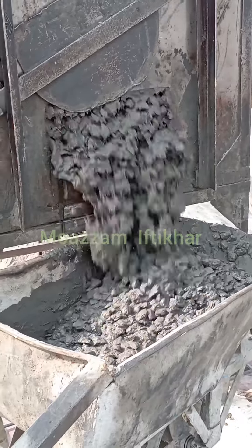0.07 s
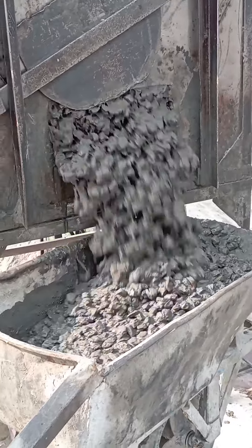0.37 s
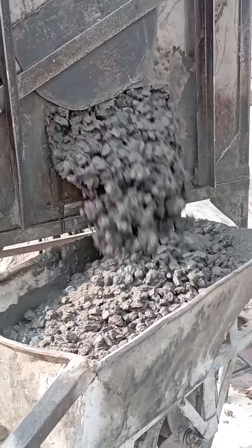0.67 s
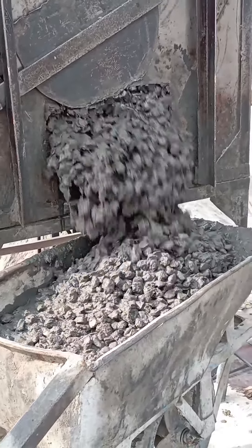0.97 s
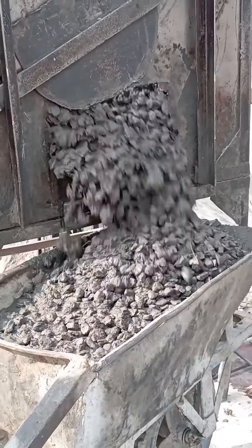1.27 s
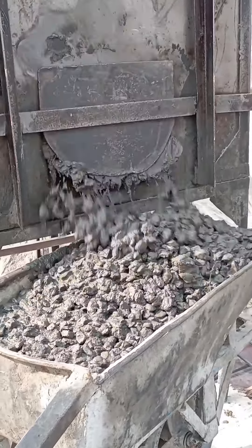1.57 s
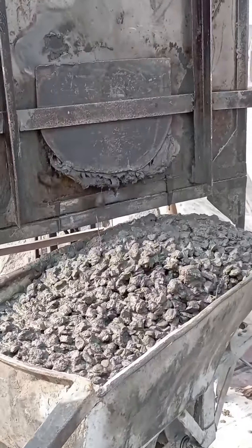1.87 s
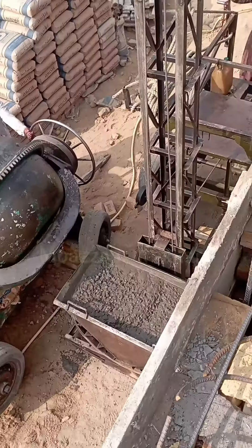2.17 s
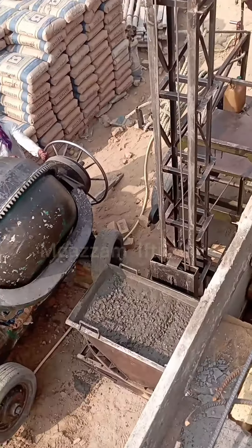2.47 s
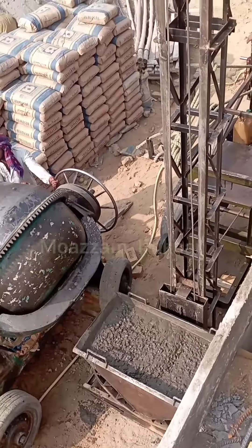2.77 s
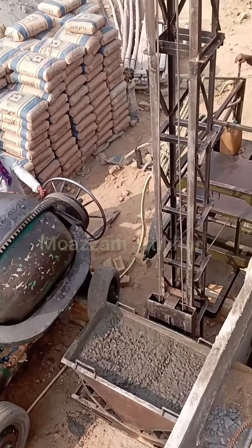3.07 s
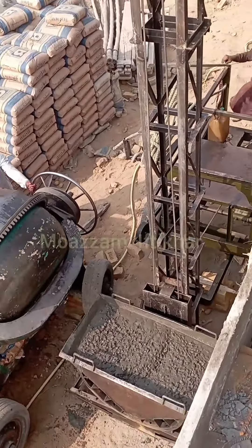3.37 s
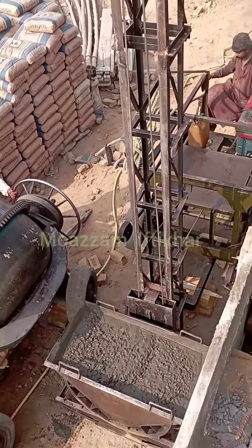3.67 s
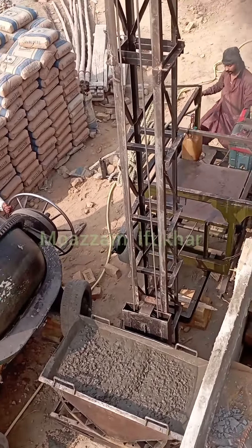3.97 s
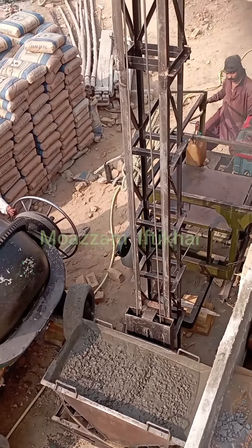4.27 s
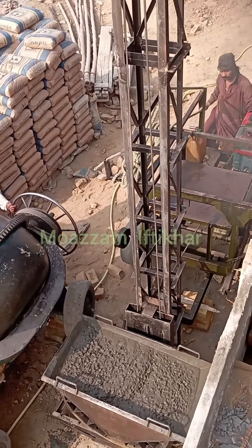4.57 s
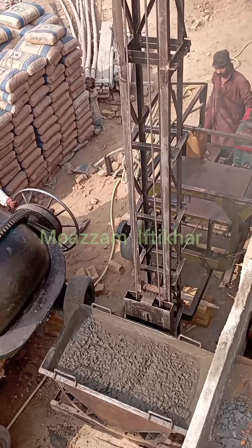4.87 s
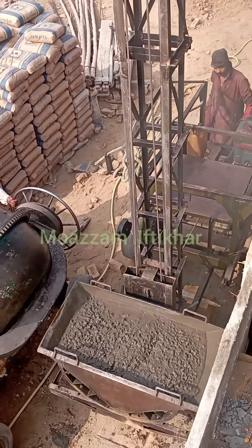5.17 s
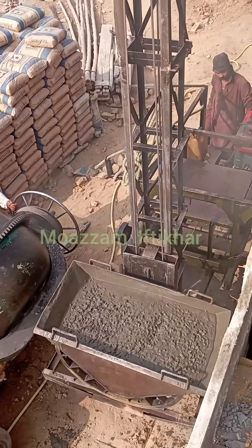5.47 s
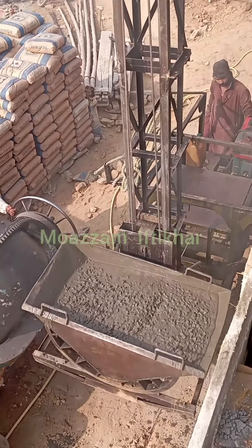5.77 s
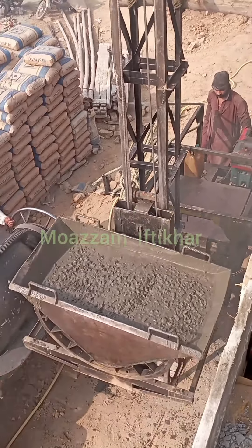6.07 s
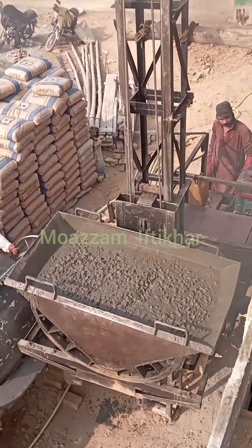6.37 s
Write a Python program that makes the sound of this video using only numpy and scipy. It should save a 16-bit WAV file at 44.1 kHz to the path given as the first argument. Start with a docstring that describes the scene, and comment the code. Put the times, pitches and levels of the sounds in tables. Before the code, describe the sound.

Wet gravelly concrete pours into a wheelbarrow over a thudding diesel, then a second, louder diesel engine speeds up.

```python
"""A building site, the microphone close beside a steel wheelbarrow. Wet concrete pours in from a mixer's
gate while its one-cylinder diesel thuds along; the gate scrapes shut and last stones drop.
After a short break the microphone is above the site: the mixer's diesel runs on while a second, louder
diesel speeds up to lift the hoist's skip, its exhaust slapping back from the walls."""
import sys
import numpy as np
from scipy import signal
from scipy.fft import rfft, irfft, next_fast_len
from scipy.io import wavfile
from scipy.ndimage import uniform_filter1d, map_coordinates

SR = 44100
rng = np.random.default_rng(int(sys.argv[2]) if len(sys.argv) > 2 else 0)


def master(y):
    """Save y as 16-bit WAV."""
    cut = np.clip(np.atleast_2d(y).T, -1, 1)
    pcm = np.round(cut * 32767)  # scale
    wavfile.write(sys.argv[1], SR, pcm.astype(np.int16))


N = 287532
TIME = np.arange(N) / SR


def amp(db):
    """Decibels to gain."""
    return 10 ** (np.asarray(db) / 20)


def unit(x):
    """Scale to rms 1."""
    return x / np.sqrt(np.mean(x ** 2) + 1e-20)


def along(points, hz):
    """Read (pitch_hz, value) rows on a log frequency axis."""
    pitches, values = np.transpose(points)
    return np.interp(np.log(hz + 1), np.log(pitches + 1), values)


def curve(rows):
    """Join (time_s, value) rows, one value per sample."""
    return np.interp(TIME, *np.transpose(rows))


def wobble(rate):
    """A smooth random curve, rate knots a second."""
    return map_coordinates(rng.standard_normal(int(N * rate / SR) + 4), [TIME * rate])


def swell(start, attack, hold, t60):
    """Envelope of one sound that rises, holds and dies."""
    age = TIME - start
    return np.clip(age / attack, 0, 1) * amp(-60 * np.maximum(age - attack - hold, 0) / t60)


def blows(times, db):
    """One impulse per event."""
    return np.bincount(np.round(np.asarray(times) * SR).astype(int), amp(db), N)[:N]


def puffs(times, db, rise, hold, t60):
    """Envelope of bursts that open, blow for a moment and die."""
    t = TIME[:SR // 4]
    shape = (1 - np.exp(-(t / rise) ** 2)) * amp(-60 * np.maximum(t - hold, 0) / t60)
    return np.sqrt(np.abs(signal.fftconvolve(blows(times, db) ** 2, shape ** 2)[:N]))


def filtered(x, response):
    """Filter x by a complex response of frequency."""
    size = 2 * next_fast_len(N // 2 + SR // 4)
    return irfft(rfft(x, size) * response(np.fft.rfftfreq(size, 1 / SR)), size)[..., :N]


def low_cut(x, hz):
    """Roll off the bass below hz."""
    return filtered(x, lambda f: f ** 3 / np.sqrt(f ** 6 + hz ** 6))


def resonate(x, hz, width):
    """One resonance; width is a share of its pitch."""
    edges = np.clip([hz / (1 + width), hz * (1 + width)], 20, [.4 * SR, .45 * SR])
    return signal.lfilter(*signal.butter(1, edges, "bandpass", fs=SR), x)


def ringing(x, colour):
    """Causal colour of unit energy: the body rings only after it is hit."""
    def response(hz):
        cepstrum = irfft(np.log(amp(along(colour, hz))))
        half = len(cepstrum) // 2
        causal = np.r_[cepstrum[0], 2 * cepstrum[1:half], np.zeros(half)]
        return unit(np.exp(rfft(causal)))
    return filtered(x, response)


def struck(hits, modes):
    """Every (start_s, level_db) blow rings the modes at new strengths."""
    t, out = TIME[:SR // 4], np.zeros(N)
    hz, level, t60 = np.transpose(modes)[:, :, None]
    for start, db in hits:
        strength, phase = rng.standard_normal((2, len(modes), 1))
        decay = amp(db + level + 2 * strength - 60 * t / t60)
        ring = np.sum(decay * np.sin(2 * np.pi * hz * t + phase), axis=0)
        span = out[round(start * SR):][:len(t)]
        span += (ring * (1 - np.exp(-t / 0.0016)))[:len(span)]
    return out


def patchy(pair, depth_db):
    """Colour that shifts from moment to moment: a random gain field over frequency and time."""
    spectra = signal.stft(pair, nperseg=512)[2]
    field = uniform_filter1d(rng.standard_normal(spectra.shape[1:]), size=4, axis=0)
    field = unit(uniform_filter1d(field, size=6, axis=1))
    return unit(signal.istft(spectra * amp(depth_db * field), nperseg=512)[1][:, :N])


def grains(rate, scatter_db):
    """Random contacts of stones of six sizes, each size with its own pitch; a few hit much harder."""
    out = np.zeros((2, N))
    for hz in np.geomspace(500, 13000, 6):
        when, luck, left, right = rng.random((int(rate * N / SR / 6), 4)).T
        force = amp(-scatter_db * np.log(np.maximum(luck, .01)))
        train = [np.bincount((when * N).astype(int), force * (side - .5), N) for side in (left, right)]
        out += resonate(np.array(train), hz, width=.3)
    return unit(out)


def firing_times(speed):
    """When an engine fires, given (time_s, firings_per_s) rows."""
    running = (TIME >= speed[0][0]) & (TIME < speed[-1][0])
    cycles = np.cumsum(curve(speed) * running) / SR
    return TIME[1:][np.diff(np.ceil(cycles)) > 0]


# How alike the microphone's left and right sides are: pitch_hz, correlation
STEREO_LIKENESS = [(60, 1), (290, 1), (640, 0.57), (1400, 0.11), (3000, 0.33), (9000, 0.12), (15000, 0.3)]
def spread(pair, colour, lead_ms=0):
    """Two unrelated signals as one coloured stereo sound of rms 1, the left side lead_ms ahead."""
    def mid_and_side(hz):
        angle = np.arccos(np.clip(along(STEREO_LIKENESS, hz), -1, 1)) / 2
        return amp(along(colour, hz)) * [np.cos(angle), np.sin(angle)]
    mid, side = filtered(pair, mid_and_side)
    right = filtered(mid - side, lambda hz: np.exp(-2j * np.pi * hz * lead_ms / 1000))
    return unit(np.array([mid + side, right]))


def noise(colour, lead_ms=0):
    """Coloured stereo noise."""
    return spread(rng.standard_normal((2, N)), colour, lead_ms)


# Decay of the site around the microphone: pitch_hz, t60_s
SITE_DECAY = [(100, 0.13), (500, 0.16), (3000, 0.45), (12000, 0.41)]
def site_echo(x):
    """Diffuse answer of the site, drifting through four different tails."""
    out = np.zeros((2, N))
    for k in range(4):
        hz, t, spectra = signal.stft(rng.standard_normal((2, SR // 3)), SR, nperseg=256)
        decay = amp(-60 * t / along(SITE_DECAY, hz)[:, None])
        mid, side = signal.istft(spectra * decay, SR, nperseg=256)[1]
        tail = np.array([mid + side / 2, mid - side / 2])
        share = np.maximum(np.cos(2 * np.pi * (3.7 * TIME - k / 4)), 0)
        out += signal.fftconvolve((x * share)[None], tail / np.linalg.norm(tail[0]), axes=1)[:, :N]
    return out


# The yard's background, from beside the barrow: pitch_hz, level_db
YARD_COLOUR = [(25, -32), (60, -15), (120, 6.5), (210, 1), (290, -18), (400, -4.5), (680, -18),
               (1800, -21.5), (3500, -22.5), (6400, -27.5), (10000, -20.5), (16000, -42)]
def yard():
    """A faint, steady rumble behind the close sounds."""
    return amp(-37.5) * noise(YARD_COLOUR)


# The machinery, from above the site: pitch_hz, level_db
DIN_COLOUR = [(15, -43), (25, -38), (64, -11), (149, -13.5), (223, 3), (344, -12.5), (451, 1), (734, -12),
              (911, -9.5), (1020, -11), (3080, -17.5), (6210, -17.5), (8830, -10.5), (14400, -22),
              (16000, -28.5)]
def machinery_din():
    """A wavering din that grows 2 dB with each doubling of the hoist engine's speed."""
    level_db = -26.5 + 2 * hoist_octaves(TIME) + 0.88 * wobble(25)
    return amp(level_db) * patchy(noise(DIN_COLOUR, lead_ms=0.089), depth_db=2.5)


# Hiss near the engines, also blown at each firing of the mixer: pitch_hz, level_db
HISS_COLOUR = [(500, -4), (1500, -5.5), (3000, -6), (6500, -3), (8800, 3), (11000, 2.5), (13000, -5.5),
               (16000, -10)]
def hissing_rush():
    """One brief hiss as the sound from above opens."""
    envelope = swell(start=2.3, attack=.06, hold=0.13, t60=0.57)
    return envelope * amp(-23.5 + 1.2 * wobble(60)) * noise(HISS_COLOUR, lead_ms=.11)


# The mixer's engine speed, from beside the barrow and from above: time_s, firings_per_s
MIXER_SPEED_CLOSE = [(.029, 10.31), (2.15, 10.31)]
MIXER_SPEED_ABOVE = [(2.344, 9.83), (6.53, 9.39)]
# Knocks within one engine cycle: delay_s, level_db
CYCLE_KNOCKS = [(0, -11.5), (.008, 0), (.026, -1.5), (.055, -10), (.072, -8), (.086, -9.5)]
# The mixer's exhaust pipe: pitch_hz, level_db
MIXER_EXHAUST = [(25, -24.5), (50, -16.5), (75, 4), (115, -3), (160, -7), (212, 2.5), (290, -9), (410, -7),
                 (600, -18.5), (1000, -24.5), (4000, -52.5)]
# The drum's shell and a loose cover: pitch_hz, level_db, t60_s
DRUM_MODES = [(76, -9, 0.18), (111, -4, 0.099), (125.4, -1.5, 0.13), (201.7, -8.5, 0.31)]
COVER_MODES = [(894, 1.5, 0.066), (926, -6, 0.041), (1440, -12, 0.044)]
def mixer_engine(speed, thump_db, shell_db, hiss_db, cover_db, echo_db, lead_ms):
    """A slow diesel: each firing thumps, hisses and shakes the drum; knocks and a cover ring between."""
    firings = firing_times(speed)
    shell_luck, hiss_luck, cover_luck, *knock_luck = rng.normal(size=(len(firings), 9)).T
    kicks = sum(blows(firings + delay, thump_db + db + luck)
                for (delay, db), luck in zip(CYCLE_KNOCKS, knock_luck))
    thump = ringing(kicks, MIXER_EXHAUST)
    shell = struck(zip(firings + 0.0053, shell_db + shell_luck), DRUM_MODES)
    gas = puffs(firings, hiss_db + 1.3 * hiss_luck, rise=0.0021, hold=0.0076, t60=0.05)
    hiss = gas * noise(HISS_COLOUR, lead_ms)
    cover = struck(zip(firings + .058, cover_db + 1.5 * cover_luck), COVER_MODES)
    # much of the thump reaches the microphone by way of the surroundings
    return thump + amp(echo_db) * site_echo(thump) + shell + hiss + cover


# The hoist engine idles, is throttled up and settles on its governor: time_s, firings_per_s
HOIST_RUN_UP = [(2.359, 7.21), (2.528, 7.21), (3.617, 11.85), (4.582, 15.115), (6.53, 15.368)]
def hoist_octaves(times):
    """Speed of the hoist engine, in octaves from full speed."""
    return np.log2(np.interp(times, *np.transpose(HOIST_RUN_UP)) / HOIST_RUN_UP[-1][1])


# The hoist's pipe, exhaust gas and engine block, from above: pitch_hz, level_db
HOIST_EXHAUST = [(25, -18), (48, -16), (85, 4.5), (130, -2.5), (170, 1), (245, 3), (360, -8), (460, -1),
                 (640, -10.5), (850, -19), (1500, -36.5), (4000, -77)]
GAS_COLOUR = [(700, -17.5), (2500, -19), (5000, -14), (6800, -10.5), (8600, 2.5), (9700, -1.5), (11300, 1),
              (13000, -4.5), (16000, -17)]
BLOCK_COLOUR = [(290, -38), (500, -8.5), (666, -6), (752, -16.5), (898, -11.5), (1020, -13), (1410, -8),
                (2080, -12), (2400, -8.5), (2890, -12.5), (3340, -10), (5870, -14), (7000, -16.5),
                (9100, -41), (15400, -120)]
# Paths from the exhaust to the microphone, direct and by ground and walls: delay_s, gain
EXHAUST_PATHS = [(0, 0.45), (0.012, 0.17), (0.0196, 0.31), (0.0211, 0.28), (0.0228, .22), (.0331, 0.11),
                 (0.0377, 0.057)]
def hoist_engine():
    """Each firing thumps through the pipe, blows a rasp of gas and rattles the block, harder at speed."""
    firings = firing_times(HOIST_RUN_UP)
    octaves = hoist_octaves(firings)
    push_luck, blow_luck = rng.standard_normal((len(firings), 2)).T
    push_db = 3.5 + 6.5 * octaves + 1.2 * push_luck
    blow_db = 5 * octaves + .6 * blow_luck
    thump = ringing(blows(firings, push_db), HOIST_EXHAUST)
    slaps = filtered(thump, lambda hz: sum(gain * np.exp(-2j * np.pi * hz * delay)
                                           for delay, gain in EXHAUST_PATHS))
    blast = puffs(firings + 0.00036, blow_db - 8.5, rise=0.0017, hold=0.006, t60=0.071)
    afterblow = puffs(firings + 0.0063, blow_db - 28, rise=0.015, hold=0.016, t60=0.11)
    rasp = patchy(noise(GAS_COLOUR, lead_ms=0.12), depth_db=3) * amp(0.94 * wobble(500))
    shake = puffs(firings, blow_db - 14.5, rise=0.0035, hold=0.004, t60=0.16)
    clatter = patchy(noise(BLOCK_COLOUR, lead_ms=0.088), depth_db=3) * amp(0.76 * wobble(300))
    echo = low_cut(site_echo(thump), hz=125)  # longer waves pass the site's clutter without scattering
    return slaps + echo + (blast + afterblow) * rasp + shake * clatter


GATE_MOVES_S, GATE_SHUT_S = 1.362, 1.558
# Steel grinding on grit, close up: pitch_hz, level_db
GRIND_COLOUR = [(88, -40), (150, -16), (259, -4), (286, 5), (457, -10), (601, -25), (649, -12),
                (923, -22.5), (998, -11), (1360, -18), (2270, -13.5), (2500, -19), (4240, -24),
                (11000, -31), (16000, -39)]
# The gate clanking in its guides; clods landing and the gate reaching its stop: start_s, level_db
GATE_CLANKS = [(.003, -20.5), (1.368, -23), (1.384, -24.5), (1.412, -22), (1.478, -26.5), (1.542, -27),
               (1.553, -26)]
BARROW_KNOCKS = [(.036, -22), (.622, -22), (.66, -24), (.731, -19.5), (.775, -30), (1.409, -26),
                 (1.556, -12.5)]
# The gate plate and the barrow's sheet steel: pitch_hz, level_db, t60_s
GATE_MODES = [(259, -1, 0.069), (325, -1, 0.086), (378, 1.5, 0.063), (436, -12, 0.04), (782, -10.5, 0.055),
              (1024, -12, 0.054), (1190, -9.5, .05), (1443, -3, 0.037), (1780, -15, 0.06),
              (2320, -11, 0.043), (2860, -16, .04)]
BARROW_MODES = [(65, -29, 0.053), (129, 0.5, 0.11), (189, -4, 0.18), (280, -10.5, 0.1)]
def gate_and_barrow():
    """The steel gate grinds over grit and clanks; heavy clods ring the loaded barrow dully."""
    # it grinds hardest on breaking loose, and again crushing grit just before its stop
    shove = amp(-26.5) * swell(GATE_MOVES_S, attack=0.0081, hold=0.021, t60=0.59) * (TIME < GATE_SHUT_S)
    jam = amp(-25.5) * swell(GATE_SHUT_S - 0.028, attack=0.028, hold=0, t60=0.085)
    pressure = (shove + jam) * amp(2.2 * wobble(130))
    grind = pressure * spread(grains(rate=9000, scatter_db=3), GRIND_COLOUR)
    steel = struck(GATE_CLANKS, GATE_MODES) + struck(BARROW_KNOCKS, BARROW_MODES)
    return grind + steel + amp(0.5) * site_echo(steel)


# The barrow's bare rim, close up: pitch_hz, level_db, t60_s
RIM_MODES = [(1190, -5, .015), (3278, -2, .014), (4177, 0, .016), (9835, -2, .014)]
def stone_on_rim(start_s=1.8015, bounce_s=0.0033):
    """A late stone cracks twice on the bare steel, which rings briefly."""
    cracks = sum(swell(s, attack=0.00025, hold=.0004, t60=0.0074) for s in (start_s, start_s + bounce_s))
    return amp(-15.5) * cracks * noise(GRAVEL_COLOUR) + struck([(start_s, -17)], RIM_MODES)


# Wet gravel landing close to the microphone: pitch_hz, level_db
GRAVEL_COLOUR = [(120, -23), (280, 2.5), (700, -6.5), (1200, -9), (3200, -9), (6200, -14.5), (9000, -6),
                 (11000, -7.5), (13000, -16.5), (16000, -20)]
# The largest stones striking: start_s, level_db, pitch_hz
STONE_TICKS = [(.104, -23, 3600), (.173, -21, 9000), (.3085, -16.5, 9000), (.476, -19, 2700),
               (.488, -24, 3600), (.575, -22, 9000), (.681, -21, 3200), (.952, -24, 4000),
               (1.052, -23, 9500), (1.102, -19, 9500), (1.9, -21, 8000)]
def concrete_pour():
    """Wet gravel slithers and lands in clumps until the gate cuts it to a dribble; single stones tick."""
    closing = np.clip((TIME - GATE_MOVES_S) / (GATE_SHUT_S - GATE_MOVES_S), 0, 1)
    # the stream thins as the mixer empties; the closing gate presses the last of it out faster
    stream_db = -33.5 - 2.5 * TIME + 8.5 * closing
    dribble_db = -41 - 60 * (TIME - GATE_SHUT_S)
    clumps_db = 1.1 * wobble(70) + .6 * wobble(10)
    flow = amp(np.where(TIME < GATE_SHUT_S, stream_db, dribble_db) + clumps_db)
    contacts = grains(rate=8000, scatter_db=3.5) + .35 * grains(rate=150, scatter_db=3)
    slither = .6 * rng.standard_normal((2, N))
    out = flow * patchy(spread(contacts + slither, GRAVEL_COLOUR), depth_db=2)
    t = TIME[:SR // 20]
    decay = amp(-60 * t / 0.0051) + 0.28 * amp(-60 * t / .04)
    for start, db, hz in STONE_TICKS:
        tick = unit(resonate(rng.standard_normal((2, len(t))), hz, width=0.17))
        out[:, round(start * SR):][:, :len(t)] += amp(db) * tick * decay
    return out


# The sound fades out and in between the two microphone positions: time_s, level_db
BREAK_FADE = [(2.14, 0), (2.152, -38), (2.2, -48), (2.238, -28), (2.246, -13), (2.29, -12), (2.335, 0)]
def scene(break_s=2.2):
    """First beside the wheelbarrow, then above the hoist; both lean a little to the right."""
    close = mixer_engine(MIXER_SPEED_CLOSE, thump_db=-14.5, shell_db=-33, hiss_db=-33,
                         cover_db=-47.5, echo_db=5.5, lead_ms=0)
    close += concrete_pour() * amp([[-.8], [.8]]) + stone_on_rim() + gate_and_barrow() + yard()
    background = machinery_din() + hissing_rush()
    mixer = mixer_engine(MIXER_SPEED_ABOVE, thump_db=-5.5, shell_db=-25, hiss_db=-15.5,
                         cover_db=-24, echo_db=5, lead_ms=0.15)
    above = background + low_cut(mixer, hz=124) + hoist_engine()
    return np.where(TIME < break_s, close, above) * amp(curve(BREAK_FADE)) * amp([[-.65], [.65]])


def record(dry):
    """Peaks stop at full scale; nothing is kept above 16.1 kHz."""
    return filtered(np.clip(dry, -1, 1), lambda hz: hz < 16100)


dry = scene()
out = record(dry)
master(out)
```